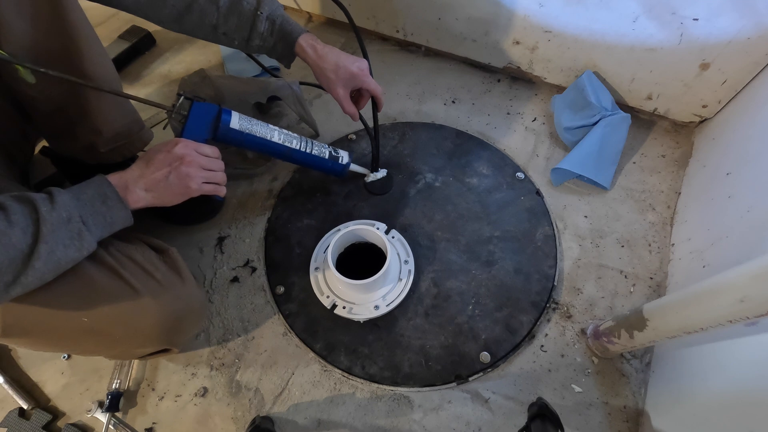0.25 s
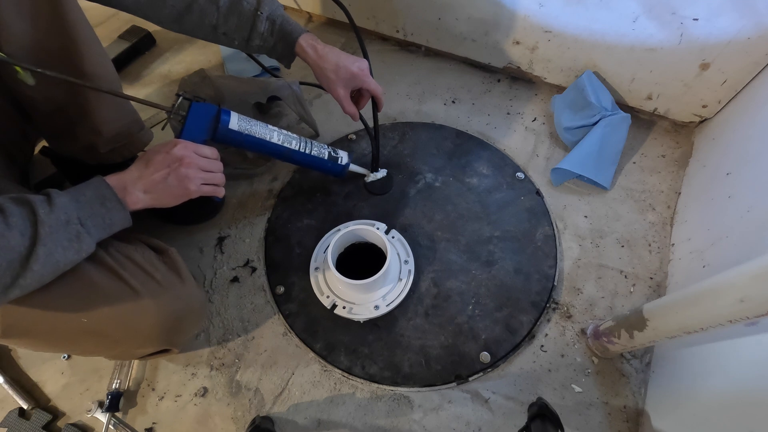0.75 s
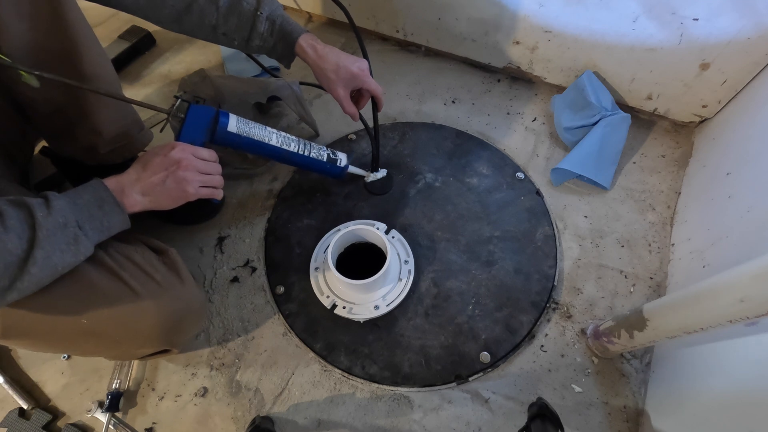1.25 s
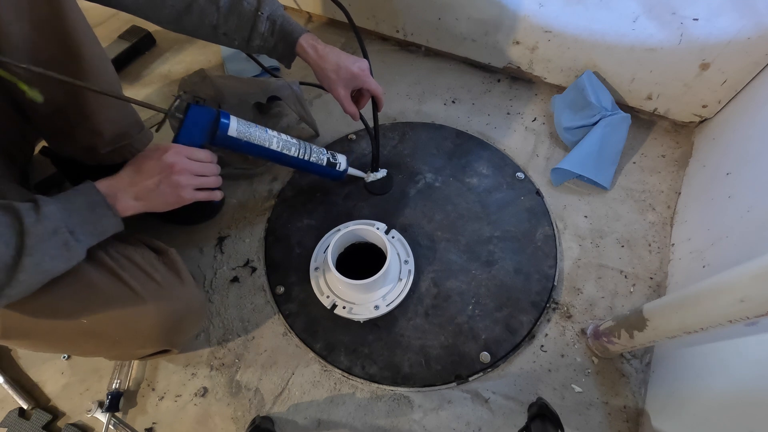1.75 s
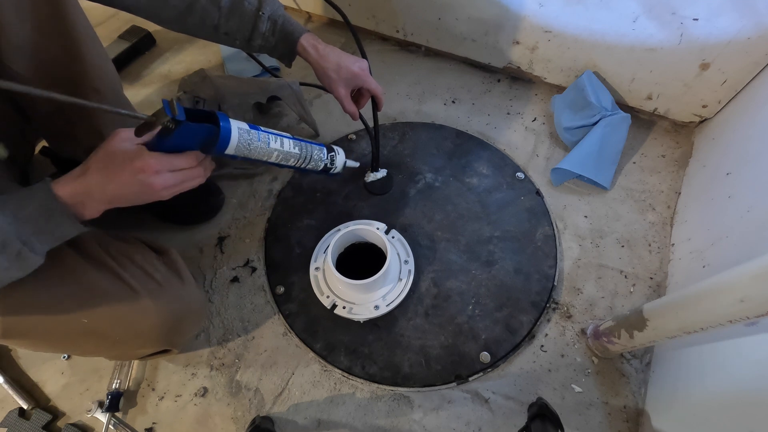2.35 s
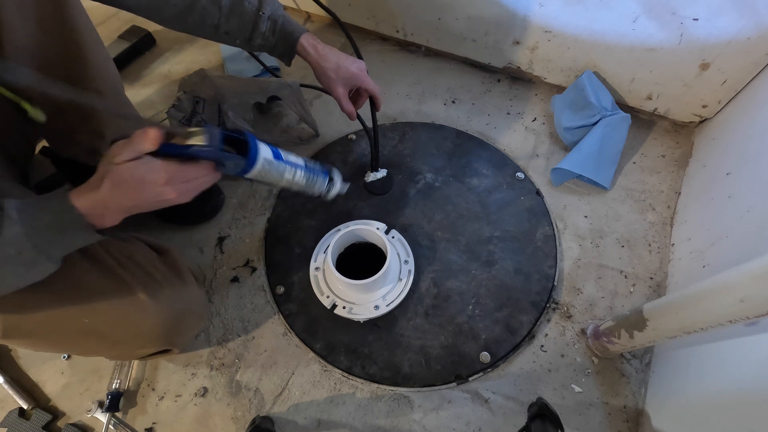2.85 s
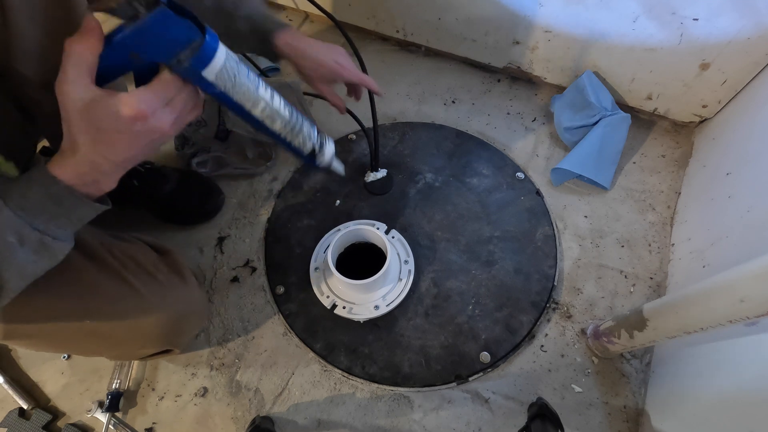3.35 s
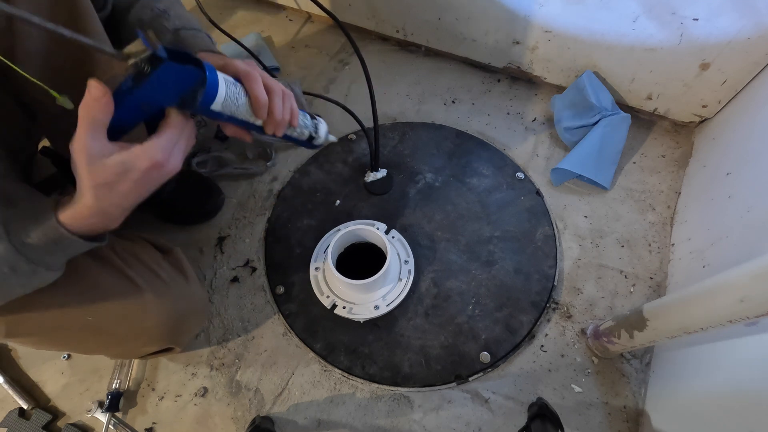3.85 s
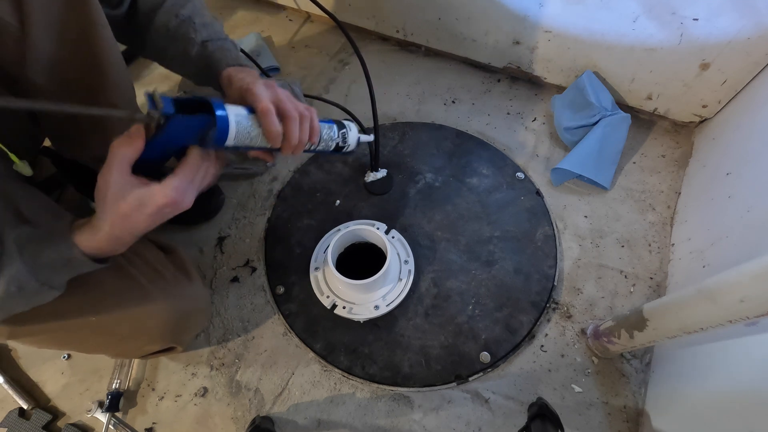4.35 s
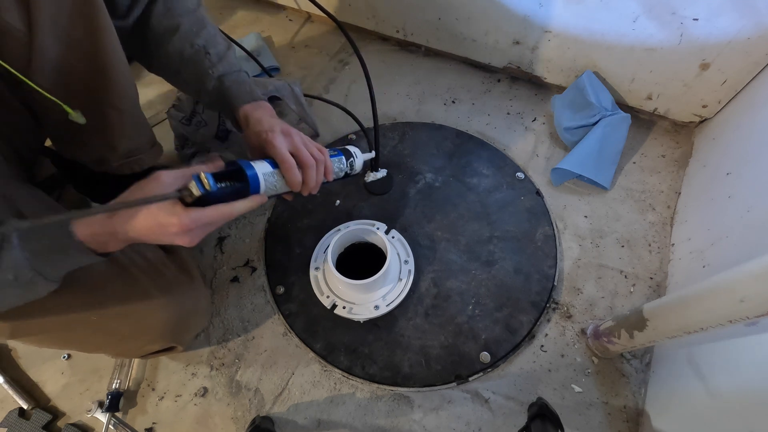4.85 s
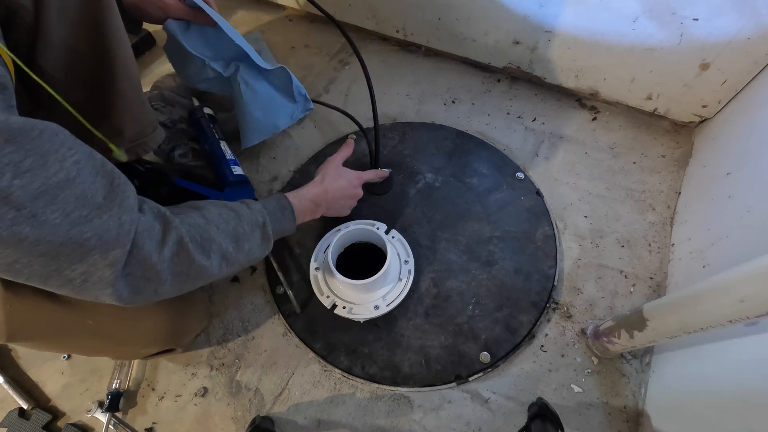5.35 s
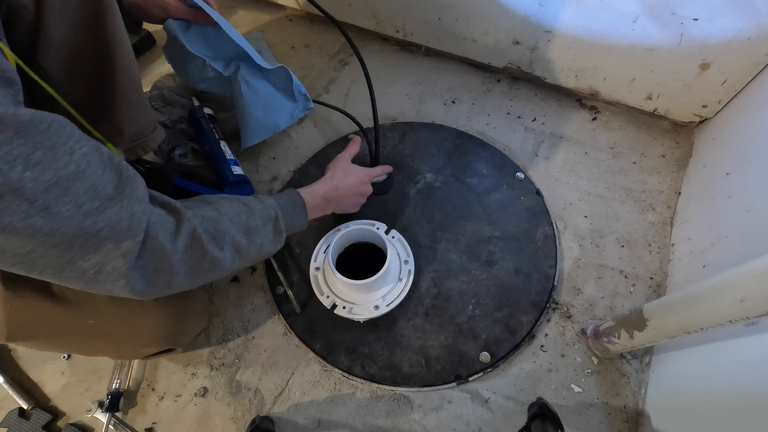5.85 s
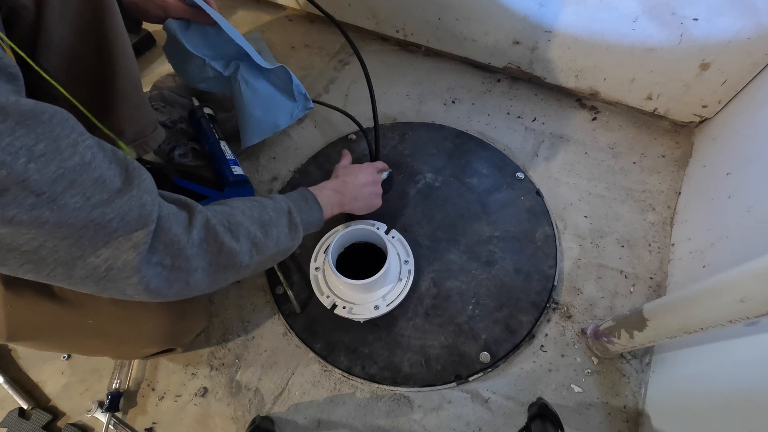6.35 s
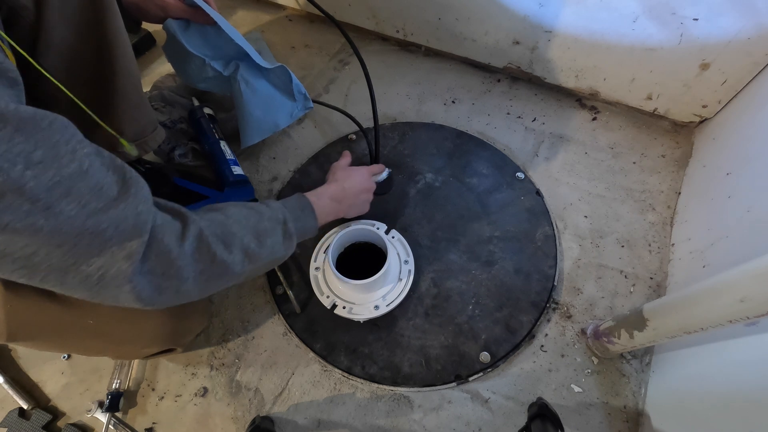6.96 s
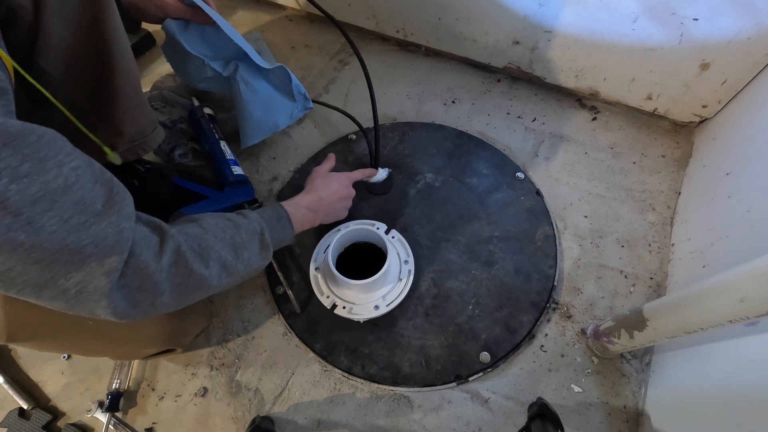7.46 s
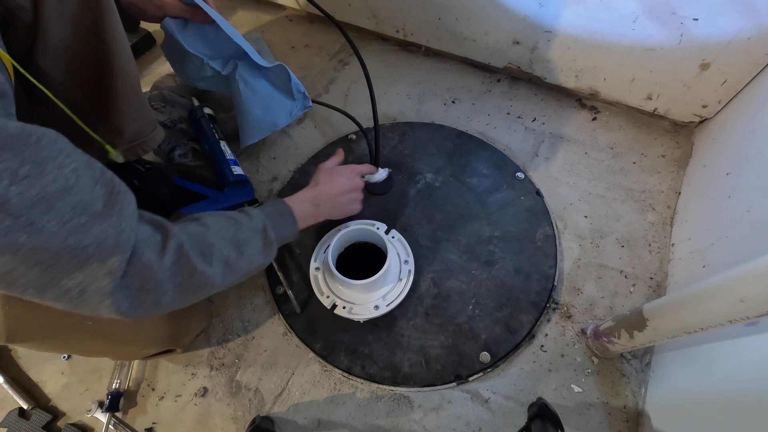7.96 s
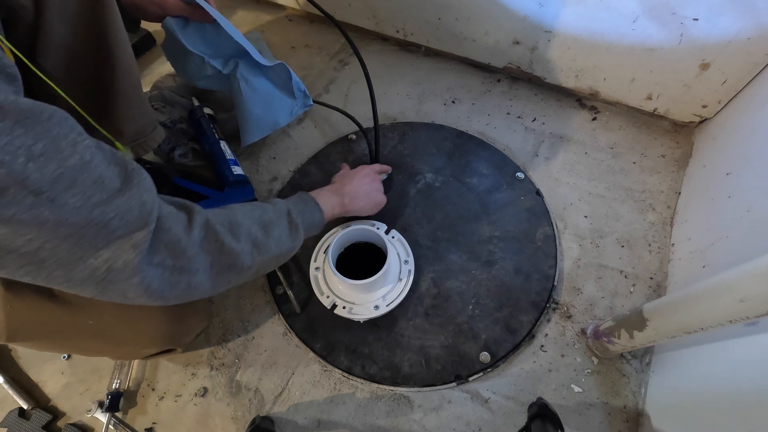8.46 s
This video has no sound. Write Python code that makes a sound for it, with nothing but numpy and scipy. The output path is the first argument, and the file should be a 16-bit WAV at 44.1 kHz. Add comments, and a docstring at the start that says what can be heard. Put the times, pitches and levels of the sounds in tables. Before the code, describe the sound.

Faint rumble and hiss in a tight hard-walled space. Sparse ticks give way to a cluster of trigger clicks and thin rasping of a steel rod, briefly singing as it binds. A woody knock booms through the floor, skin brushes the tube, and a piercing metallic snap rings springily, followed by a strong clack and smaller ones. Then it is almost still, with tiny soft taps, heard close in stereo.

```python
"""In a small moulded compartment a caulking gun is worked: its trigger clicks and its steel rod scrapes along.
A bump sets floor panel modes booming, a palm slides along the tube, then the catch lets go with a loud snap.
The spring rings on as many crowded modes while the loose rod clacks back and damps it.
Blows ring resonances, rubbing shapes coloured noise, and a low rumble with a thin hiss fills the space."""
import sys
import numpy as np
from scipy import signal
from scipy.fft import rfft, irfft, next_fast_len
from scipy.io import wavfile
from scipy.ndimage import map_coordinates

SR = 44100
rng = np.random.default_rng(int(sys.argv[2]) if len(sys.argv) > 2 else 0)


def master(y):
    """Save y as 16-bit WAV."""
    cut = np.clip(np.atleast_2d(y).T, -1, 1)
    pcm = np.round(cut * 32767)  # scale
    wavfile.write(sys.argv[1], SR, pcm.astype(np.int16))


N = 384111
TIME_S = np.arange(N) / SR
RING_TIME_S = np.arange(SR) / SR


def amp(db):
    """Level law: decibels to amplitude ratio."""
    return 10 ** (np.asarray(db) / 20)


def unit(x):
    """Normalisation: scale to rms 1."""
    return x / np.sqrt(np.mean(x ** 2) + 1e-20)


def along(points, hz):
    """Logarithmic frequency scale: interpolate (Hz, value) points along it."""
    f, v = np.transpose(points)
    return np.interp(np.log(hz + 1), np.log(f + 1), v)


def wobble(rate):
    """Slow modulation: a smooth random curve with rate knots a second."""
    knots = rng.standard_normal(int(N * rate / SR) + 4)
    return map_coordinates(knots, [np.arange(N) * rate / SR])


def filtered(x, response):
    """Linear filtering: multiply the spectrum of x by a response of frequency."""
    n = x.shape[-1]
    padded = next_fast_len(n + 8192)
    spectrum = rfft(x, padded) * response(np.fft.rfftfreq(padded, 1 / SR))
    return irfft(spectrum, padded)[..., :n]


def smooth(points):
    """Spectral envelope: the response through (Hz, dB) points."""
    return lambda hz: amp(along(points, hz))


def peaked(peaks):
    """Resonance curves: the powers of (Hz, width Hz, dB) peaks added."""
    def response(hz):
        power = sum((amp(db) * hz * w) ** 2 / ((c * c - hz * hz) ** 2 + (hz * w) ** 2) for c, w, db in peaks)
        return np.sqrt(power)
    return response


def noise(colour, alike, size):
    """Interaural coherence: stereo noise of rms 1 whose mid and side shares set the left-right correlation."""
    turn = lambda hz: np.arccos(np.clip(along(alike, hz), -1, 1)) / 2
    shares = lambda hz: colour(hz) * [np.cos(turn(hz)), np.sin(turn(hz))]
    mid, side = filtered(rng.standard_normal((2, size)), shares)
    return unit(np.array([mid + side, mid - side]))


def fade(t60, t=RING_TIME_S):
    """Exponential decay: a fall of 60 dB in t60 seconds."""
    return np.exp(-np.log(1000) * t / t60)


# left-right correlation of direct sound: pitch_hz, correlation (no unit)
DIRECT_CORRELATION = [(300, 0.65), (6000, 0.86), (12000, 0.7323)]


def burst(colour, t60, rise=0.00019, size=8192):
    """Impact noise: noise of rms 1 under a short rise (s) and an exponential decay (s)."""
    t = RING_TIME_S[:size]
    shape = fade(t60, t) * (1 - np.exp(-t / rise))
    shaped = noise(colour, DIRECT_CORRELATION, size) * shape
    return unit(shaped) * np.sqrt(np.mean(shape ** 2))


def dying(x, t60s):
    """Frequency-dependent damping: each band of x decays at its own speed."""
    hz, t, z = signal.stft(x, SR, nperseg=256)
    damped = z * fade(along(t60s, hz)[:, None], t)
    return signal.istft(damped, SR, nperseg=256)[1][:, :x.shape[-1]]


def struck(peaks, scatter_db=2.0, size=8192):
    """Modal ringing: one blow excites modes at scattered strengths, peak 1; wide modes die first."""
    t = RING_TIME_S[:size]
    ring = 0
    for k, (hz, width, db) in enumerate(peaks):
        strength = amp(db + scatter_db * rng.standard_normal()) * width * (-1) ** k
        ring = ring + strength * np.exp(-np.pi * width * t) * np.sin(2 * np.pi * hz * t)
    return ring / np.abs(ring).max()


def stroke(s, length, attack, release_t60, sag_db_per_s=0):
    """Friction envelope: a rubbing stroke swells, holds while sagging, and dies away."""
    t = np.maximum(TIME_S - s, 0)
    swell = (1 - np.exp(-t / attack)) ** 2
    return swell * amp(-sag_db_per_s * t) * fade(release_t60, np.maximum(t - length, 0))


def add(track, s, sound):
    """Superposition: mix a sound in at time s."""
    part = track[:, round(s * SR):][:, :sound.shape[-1]]
    part += sound[..., :part.shape[1]]


# the catch skidding on the rod, spectrum: pitch_hz, relative level_db_per_hz
SKID_SPECTRUM = [(150, -3.5), (480, -19), (780, 3), (1300, 0), (3300, -11), (6700, -5), (9000, -12),
                 (12500, -15), (15000, -33)]
# first stages of the skid: start_s, relative level_db, t60_s
SKID_STAGES = [(4.404, -43.5, 0.14), (4.415, -35, 0.06), (4.4211, -16.5, 0.039), (4.4236, -19, 0.025)]
# the catch chattering home: start_s, relative level_db
CATCH_SLAMS = [(4.4261, 0.5), (4.4266, -1), (4.4283, -6.5), (4.4303, -11)]
# modes of the catch plate: pitch_hz, width_hz, relative level_db
CATCH_MODES = [(2025, 240, -9.5), (2720, 260, -7.5), (4850, 170, -8.5), (5330, 220, -4.5), (5720, 260, -5),
               (6340, 140, -2), (6680, 190, 1.5), (7300, 220, 0), (7996, 180, -8), (9050, 270, -7),
               (10800, 350, -10), (12190, 380, -15)]
# modes of the gun's frame, also rung by clicks and scrapes: pitch_hz, width_hz, relative level_db
FRAME_MODES = [(907, 22, -10), (1230.3, 77, -8), (1522, 88, -12.5), (1898, 160, -2.5), (2110, 57, -1.5),
               (2360, 120, -6.5), (2800, 66, -6.5), (3010, 65, -7), (3257, 51, -8.5), (3935, 62, -10),
               (5000, 230, -13), (7260, 215, -19)]


def snap(rattle_db=-19, rattle_t60=0.051, push_db=-11.0, push_width_s=.0015, push_lag_s=0.005,
         frame_db=-17, frame_lag_s=.0032):
    """Impact and recoil: the catch skids and chatters home; recoil rings the frame and pushes low, most on the right."""
    out = np.zeros((2, N))
    for s, db, t60 in SKID_STAGES:
        add(out, s, amp(db) * burst(smooth(SKID_SPECTRUM), t60))
    for s, db in CATCH_SLAMS:
        add(out, s, amp(db) * struck(CATCH_MODES, scatter_db=3.5))
    # thin steel radiates little low mid
    out = filtered(out, smooth([(200, 0.5), (550, -7), (1000, -0.5), (12000, -2.0), (14000, -9)]))
    home_s = CATCH_SLAMS[0][0]
    add(out, home_s, amp(rattle_db) * burst(peaked(CATCH_MODES), rattle_t60))
    add(out, home_s + frame_lag_s, amp(frame_db) * struck(FRAME_MODES))
    push = np.exp(-((RING_TIME_S - push_lag_s) / push_width_s) ** 2)
    push = signal.lfilter(*signal.butter(1, 40, "highpass", fs=SR), push)
    add(out, home_s, amp(push_db) * amp([[-4], [4]]) * push)
    return out


# the spring's crowded modes, spectrum: pitch_hz, relative level_db_per_hz
COIL_SPECTRUM = [(850, -24), (930, 1), (1050, -14), (1300, -16.5), (1680, -7), (1760, 1), (2800, 0),
                 (3200, -4), (4350, -12), (4780, 4), (5050, -6), (5420, 3), (5900, -3), (6900, 4),
                 (7900, -6), (9100, -5.5), (9700, -16.5), (12400, -14), (14500, -30)]
# the spring's clear tones: pitch_hz, relative level_db
SPRING_TONES = [(985, -55), (1750, -53.5), (1928, -57), (2062, -55), (2245, -55), (2584, -56), (2840, -58),
                (4818, -55), (5405, -53), (6702, -56), (6946, -54)]
# decay of the spring: pitch_hz, t60_s
SPRING_DECAY = [(1000, 0.72), (2200, .75), (5500, 0.86), (8000, .62), (12000, .58)]
# modes of the hollow tube: pitch_hz, width_hz, relative level_db
TUBE_MODES = [(868, 26, -1), (953, 8.9, 1)]
DAMP_S, DAMP_LENGTH_S, DAMP_DB = 4.629, 0.069, -5.5  # the returning rod damps the spring


def spring(s=4.428, coils_db=-33.8, scatter_db=3, tones_db=5, tube_db=-42, count=420):
    """Modal density: clear tones ring among crowded weak modes; the returning rod damps them and knocks the tube."""
    t = RING_TIME_S[:SR // 2]
    order = (np.arange(count) + rng.random(count)) / count
    # bending modes spread out as they rise
    hz = np.interp(order, [0, 1], np.sqrt([COIL_SPECTRUM[0][0], COIL_SPECTRUM[-1][0]])) ** 2
    # the fourth root makes up for the wider spacing
    size = smooth(COIL_SPECTRUM)(hz) * np.sqrt(np.sqrt(hz)) * amp(scatter_db * rng.standard_normal(count))
    # phases in cycles, slightly different left and right
    phase = rng.random((count, 1)) + .04 * rng.standard_normal((2, count, 1))
    modes = size[:, None] * np.sin(2 * np.pi * (hz[:, None] * t + phase))
    crowd = unit(np.sum(modes, axis=1))
    tones = sum(amp(db + tones_db) * np.sin(2 * np.pi * (f * t + rng.random())) for f, db in SPRING_TONES)
    out = np.zeros((2, N))
    add(out, s, dying(amp(coils_db) * crowd + tones, SPRING_DECAY))
    pressed = np.clip((TIME_S - DAMP_S) / DAMP_LENGTH_S, 0, 1)
    out = out * amp(DAMP_DB * pressed)
    add(out, DAMP_S, amp(tube_db) * struck(TUBE_MODES))
    return out


# trigger and rod contacts, levels relative: start_s, level_db, low_body_db, bright_edge_db,
# lower_note_hz, upper_note_hz, rod_ping_db, frame_db
CONTACTS = [(0.1755, -52.5, -13, -36, 2180, 2470, -22, -9), (1.6705, -31, -15, -14.5, 1430, 3100, -30, -17),
            (1.687, -48, -5, -18, 1500, 3200, -20, -12), (1.716, -34, -8.5, -11.5, 1620, 1810, -19, -8.5),
            (1.8074, -43.5, -4.5, -14.5, 2100, 3050, -6.5, -12),
            (2.014, -38.5, -11, -11, 1670, 2750, -9, -12), (2.0423, -48, -4.5, -14, 2180, 2680, -26, -4),
            (2.0616, -47.5, -4, -12, 2120, 2750, -22, -9), (2.115, -43, -12, -18, 1490, 2670, -20, -11),
            (3.1633, -33, -13.5, -18.5, 2140, 2630, -22, -9.5),
            (3.778, -48, -10, -30, 2180, 2850, -14, -13), (3.843, -51, -10, -43, 1760, 2600, -14, -12),
            (4.0659, -44, -11, -25, 2250, 2920, -4, -11), (4.629, -10.5, -12, -15, 2010, 2900, -29, -16),
            (4.6766, -24.5, -7.5, -16, 2090, 5300, -25, -9),
            (4.7985, -35.5, -24, -18, 3100, 3060, -25, -15)]
# metal on metal, spectrum: pitch_hz, relative level_db_per_hz
CLACK_SPECTRUM = [(450, -31), (900, -7), (2300, -3.5), (3000, -5), (3900, -12), (5400, -12.5), (6900, -5.5),
                  (9000, -14), (12500, -24.5), (15000, -46.5)]
# modes of the rod's ping: pitch_hz, width_hz, relative level_db
ROD_PING_MODES = [(2136, 66, -4), (2210, 20, 1)]


def clicks(crack_t60=0.0336, crack_db=1, lower_db=-6, upper_db=-8.0, note_q=15, shiver_db=-13,
           shiver_t60=0.13, rebound_s=0.0078, rebound_db=-5, lead=256):
    """Impact excitation: contacts crack, ring frame and rod, and rebound; where each lands sets its two notes."""
    out = np.zeros((2, N))
    for s, db, low_db, edge_db, lower_hz, upper_hz, rod_db, frame_db in CONTACTS:
        crack = amp(crack_db) * burst(smooth(CLACK_SPECTRUM), crack_t60, rise=0.00039)
        hit = amp(frame_db) * (crack + struck(FRAME_MODES))
        hit += amp(lower_db) * struck([(lower_hz, lower_hz / note_q, 0)])
        hit += amp(upper_db) * struck([(upper_hz, upper_hz / note_q, 0)])
        hit += amp(rod_db) * struck(ROD_PING_MODES)
        hit += amp(frame_db + shiver_db) * burst(peaked(FRAME_MODES), shiver_t60, rise=0.003)
        rebound = amp(frame_db + rebound_db) * struck(FRAME_MODES, scatter_db=5)
        add(hit, rebound_s * rng.uniform(.7, 1.6), rebound)
        # each contact has its own low body and bright edge
        tilt = [(350, -45), (600, -28), (900, low_db + 12.0), (1500, low_db + 11.0), (2200, -1.0),
                (3100, 0.5), (5500, edge_db + 17.5), (13000, 1.77 * edge_db + 25.0)]
        # lead samples of silence make room for what the filter spreads ahead of the blow
        padded = np.hstack([np.zeros((2, lead)), hit])
        add(out, s - lead / SR, amp(db) * filtered(padded, smooth(tilt)))
    return out


# slides of the rod, after a short opening handling rustle, levels relative:
# start_s, length_s, time_to_gather_speed_s, rasp_db, singing_db (where it binds)
RUBBING_STROKES = [(0, .1, 0.0042, -77, -84), (1.628, 0.36, 0.022, -65.5, -76),
                   (1.991, 0.13, 0.0097, -66, -69.5), (2.116, .31, 0.022, -72.5, -79),
                   (2.622, 0.28, 0.026, -70, -80), (2.776, 0.14, 0.051, -61, -57.5),
                   (2.923, 0.18, 0.0079, -68, -76), (3.118, 0.054, 0.014, -63.5, -57.5),
                   (3.403, 0.83, 0.041, -78, -91), (4.207, 0.26, 0.031, -66, -94)]
# rasp of the rod, spectrum: pitch_hz, relative level_db_per_hz
RASP_SPECTRUM = [(700, -26), (950, -11), (1300, -7.5), (2000, -9.5), (2800, -14), (3600, -17),
                 (5000, -11.5), (7000, -11.5), (8400, -20), (12400, -24), (15000, -48)]
# singing of the binding rod: pitch_hz, width_hz, relative level_db
SINGING_MODES = [(2140, 80, 0), (2650, 160, -6.5), (6810, 90, -11)]
STROKE_SAG_DB_PER_S, STROKE_RELEASE_T60_S = 2.5, .2  # every stroke slows a little and stops


def scrapes(grain_db=1.03, judder_db=1.4, bind_db=2.0, slips_per_s=130, slips_db=-5):
    """Stick-slip friction: after a handling rustle the rod rasps, ticks the frame with tiny slips and sings unevenly."""
    rubbing = binding = 0
    for s, length, attack, rasp_db, sing_db in RUBBING_STROKES:
        rub = stroke(s, length, attack, STROKE_RELEASE_T60_S, STROKE_SAG_DB_PER_S)
        rubbing = rubbing + amp(rasp_db) * rub
        binding = binding + amp(sing_db) * rub
    grain = amp(grain_db * wobble(300) + judder_db * wobble(45))
    slips = rng.standard_normal(N) * (rng.random(N) < slips_per_s / SR)
    ticking = unit(signal.fftconvolve(slips, struck(FRAME_MODES))[:N])
    rasp = rubbing * (noise(smooth(RASP_SPECTRUM), DIRECT_CORRELATION, N) + amp(slips_db) * ticking)
    # below its lowest mode the singing is weakened further
    colour = lambda hz: peaked(SINGING_MODES)(hz) * np.minimum(hz / SINGING_MODES[0][0], 1)
    song = binding * amp(bind_db * wobble(45)) * noise(colour, DIRECT_CORRELATION, N)
    return grain * (rasp + song)


def ping(s=3.162, db=-69, hz=13120, width_hz=180, t60=0.18):
    """Narrow-band resonance: the tip of the rod rings with one rough, very high note."""
    out = np.zeros((2, N))
    add(out, s, amp(db) * burst(lambda f: peaked([(hz, width_hz, 0)])(f) ** 2, t60))
    return out


# skin on the tube, spectrum: pitch_hz, relative level_db_per_hz
SKIN_SPECTRUM = [(1700, -41), (2900, -18), (3900, -14), (5000, -4), (6300, 3), (8150, -5), (12800, -7.5),
                 (15500, -30)]
# the palm's one stroke along the tube
PALM_S, PALM_LENGTH_S, PALM_DB, PALM_ATTACK_S, PALM_RELEASE_T60_S = 3.611, 0.088, -59.3, .007, 0.16


def palm(grain_db=1.5, fall=.8):
    """Speed-dependent friction: a palm brushes the tube and its swish sinks in pitch as the hand slows."""
    turn = np.clip((TIME_S - PALM_S) / PALM_LENGTH_S, 0, 1) * np.pi / 2
    fast = noise(smooth(SKIN_SPECTRUM), DIRECT_CORRELATION, N)
    slow = noise(lambda hz: smooth(SKIN_SPECTRUM)(hz / fall), DIRECT_CORRELATION, N)
    brush = stroke(PALM_S, PALM_LENGTH_S, PALM_ATTACK_S, PALM_RELEASE_T60_S)
    swish = np.cos(turn) * fast + np.sin(turn) * slow  # equal-power crossfade
    return amp(PALM_DB + grain_db * wobble(200)) * brush * swish


# soft finger ticks, and the bright start of the tick at 3.84 s:
# start_s, relative level_db, pitch_hz, t60_s
SOFT_TICKS = [(0.344, -63, 2480, .03), (0.377, -59, 794, 0.097), (0.434, -68, 6800, 0.037),
              (3.837, -57, 7700, 0.034), (4.784, -53, 843, 0.047), (6.089, -69, 6000, .03),
              (6.239, -68, 6460, .03), (7.6294, -67, 5480, .035), (7.63, -62.5, 1387, 0.15)]


def taps():
    """Heavily damped impact: soft finger ticks with no ring, and the bright start of one contact's tick."""
    out = np.zeros((2, N))
    for s, db, hz, t60 in SOFT_TICKS:
        pad = peaked([(hz, 0.65 * hz, 0)])
        add(out, s, amp(db) * burst(lambda f: pad(f) ** 2, t60, rise=0.00092))
    return out


# contacts on the floor, levels relative: start_s, woody_knock_db, dull_puff_db
FLOOR_CONTACTS = [(2.997, -21, -35), (3.0012, -33, -39), (3.0098, -25, -25), (3.0128, -27, -26.5)]
# the knock on the hollow floor: pitch_hz, width_hz, relative level_db
KNOCK_MODES = [(487, 60, 6), (916, 76, -4), (1130, 70, -3), (1314, 88, -2.5), (2350, 91, -21)]
# the dull puff, spectrum: pitch_hz, relative level_db_per_hz
THUD_SPECTRUM = [(170, -3), (290, -17), (510, 3), (728, -9), (928, -9), (1350, -13.5), (1640, -18.5),
                 (2620, -15), (3300, -26), (5250, -21), (12000, -63), (22000, -120)]
# floor panel modes: pitch_hz, relative level_db, t60_s
PANEL_MODES = [(37.94, -15.5, 0.92), (57.63, -8.5, 0.384), (113, -20.5, 0.22), (336, -36, 0.28),
               (479, -32, 0.2), (551, -40, 0.18)]


def bump(s=3.0025, panel_db=0.0, puff_t60=0.036, tail_db=-40, tail_t60=0.28, settled_after_s=0.167, rise_s=0.0045):
    """Panel resonance: quick woody contacts set the hollow floor booming until the weight settles on it."""
    out = np.zeros((2, N))
    for start, knock_db, puff_db in FLOOR_CONTACTS:
        knock = amp(knock_db) * struck(KNOCK_MODES)
        add(out, start, knock + amp(puff_db) * burst(smooth(THUD_SPECTRUM), puff_t60))
    add(out, s, amp(tail_db) * burst(smooth(THUD_SPECTRUM), tail_t60))
    boom = sum(amp(db) * np.sin(2 * np.pi * hz * RING_TIME_S) * fade(t60) for hz, db, t60 in PANEL_MODES)
    # the settling weight stops the boom within 41 ms
    free = np.clip((settled_after_s - RING_TIME_S) / 0.041 + 1, 0, 1)
    add(out, s, amp(panel_db) * boom * free * (1 - np.exp(-RING_TIME_S / rise_s)))
    return out


# decay of the close walls: pitch_hz, t60_s
WALL_DECAY = [(200, .3), (2000, .3), (6000, 0.13), (12000, 0.19)]
# left-right correlation of diffuse sound, also used by the background: pitch_hz, correlation (no unit)
DIFFUSE_CORRELATION = [(90, 1), (200, 0.95), (800, 0.46), (2500, 0.54), (6000, 0.46), (12000, .2)]


def walls(x):
    """Reverberation: the close walls answer with a short diffuse tail."""
    colour = smooth([(150, -8.5), (800, -1), (3000, 2.0), (12000, -2.5)])
    tail = dying(noise(colour, DIFFUSE_CORRELATION, SR // 2), WALL_DECAY)
    return signal.fftconvolve(x, tail / np.linalg.norm(tail[0]), axes=1)[:, :N]


# the low rumble, spectrum: pitch_hz, relative level_db_per_hz
RUMBLE_SPECTRUM = [(15, -15.5), (27, -3), (42, 0), (80, -9), (140, -11), (200, -20), (280, -24), (355, -37),
                   (510, -31.5), (790, -47), (1200, -76.5)]
# the thin hiss, spectrum: pitch_hz, relative level_db_per_hz
HISS_SPECTRUM = [(470, -35), (800, -10.5), (1050, 0), (1710, -9), (2380, -9.5), (2630, -14.5),
                 (3710, -18.5), (6930, -18), (11000, -34), (12600, -29), (15000, -42)]
# brief dips of the rumble: centre_s, width_s, level_db
RUMBLE_LULLS = [(.1, .25, -1), (3.4, .3, -2.5), (4.68, .2, -8)]


def background(rumble_db=-45.0, hiss_db=-76, flutter_db=1.33):
    """Diffuse field: an uneven low rumble with a few lulls, under a thin steady hiss."""
    lull_db = sum(db * np.exp(-((TIME_S - s) / width) ** 2) for s, width, db in RUMBLE_LULLS)
    level = amp(rumble_db + lull_db + flutter_db * wobble(12))
    rumble = level * noise(smooth(RUMBLE_SPECTRUM), DIFFUSE_CORRELATION, N)
    return rumble + amp(hiss_db) * noise(smooth(HISS_SPECTRUM), DIFFUSE_CORRELATION, N)


# stereo balance of the gun and bump: pitch_hz, left_minus_right_db
STEREO_BALANCE = [(60, 0), (400, -1), (2000, 1.5), (6000, 1.5), (12000, 5.5)]
STOP_S = 4.868  # the gun's sound is cut short here


def scene(wet_db=-15, left_lag_s=.000012):
    """Interaural level and time difference: treble leans left, left lags; the gun is cut short after the last clack."""
    gun = snap() + spring() + clicks() + scrapes() + ping() + palm() + bump()
    balance = lambda hz: amp(np.outer([.5, -.5], along(STEREO_BALANCE, hz)))
    gun = filtered(gun + amp(wet_db) * walls(gun), balance)
    sounding = np.clip((STOP_S - TIME_S) / 0.0066, 0, 1)
    # half the lag delays the left, half advances the right
    lag = lambda hz: np.exp(-1j * np.pi * left_lag_s * np.outer([1, -1], hz))
    return filtered(gun * sounding + taps() + background(), lag)


def record(dry, top_hz=15300):
    """Overload and band limit: clip at full scale, then a steep low-pass."""
    return filtered(np.clip(dry, -1, 1), lambda hz: 1 / (1 + (hz / top_hz) ** 80))


dry = scene()
out = record(dry)
master(out)
```